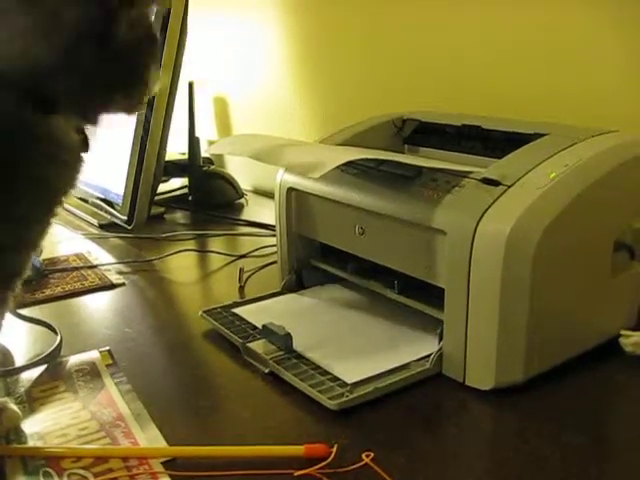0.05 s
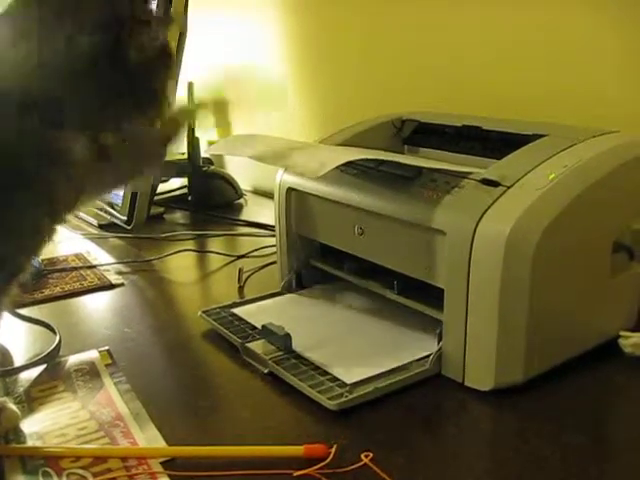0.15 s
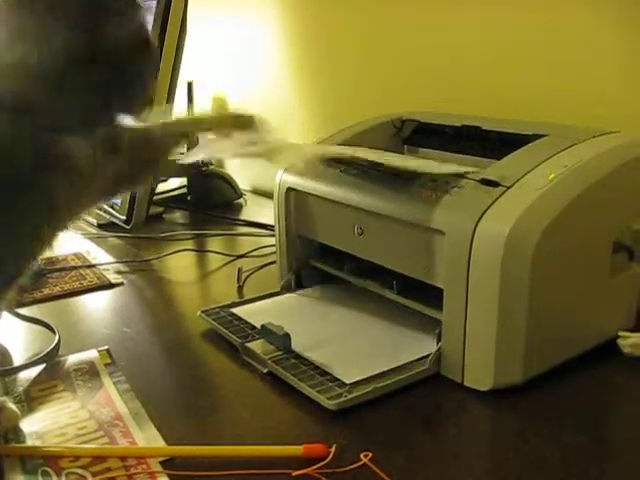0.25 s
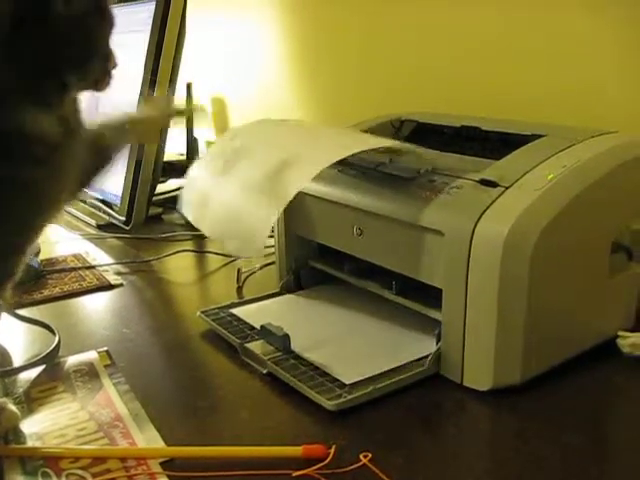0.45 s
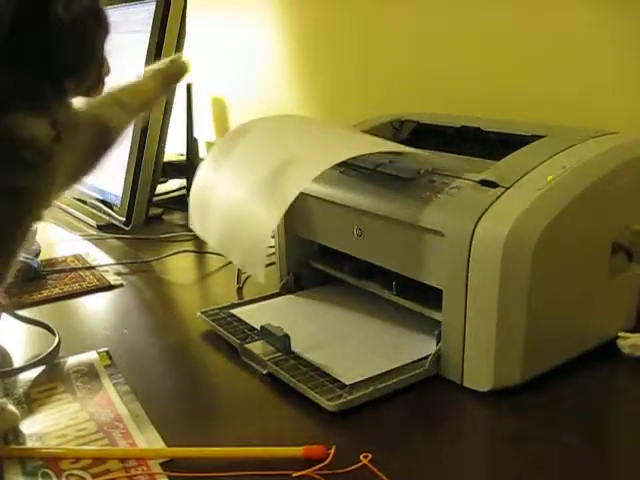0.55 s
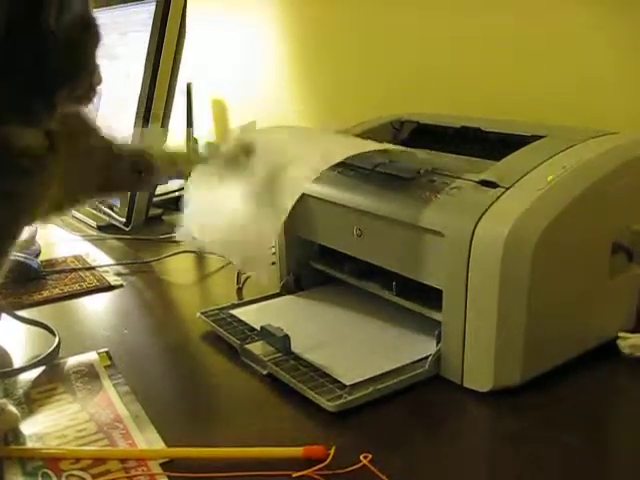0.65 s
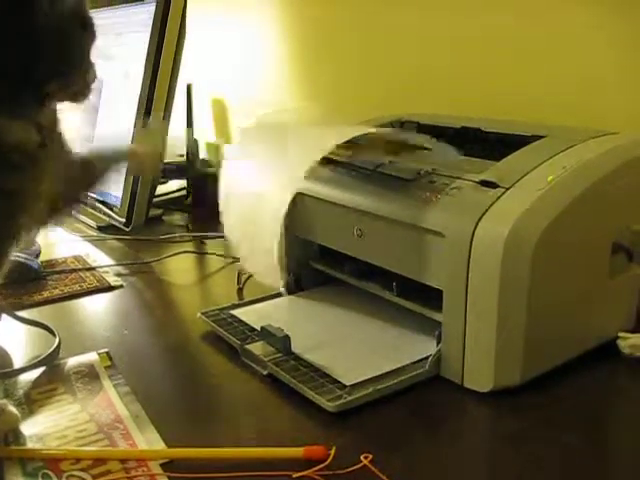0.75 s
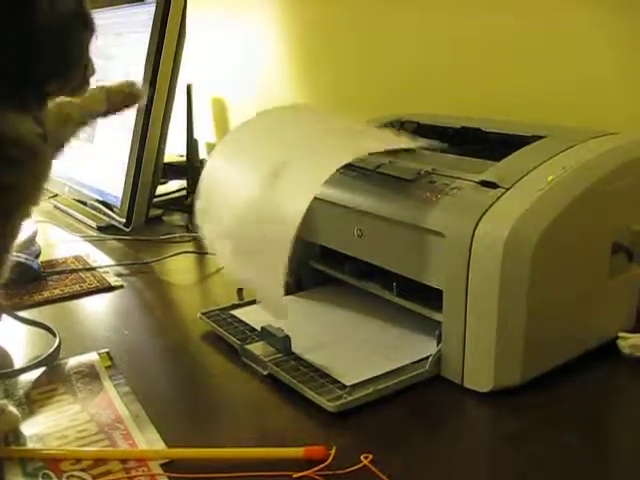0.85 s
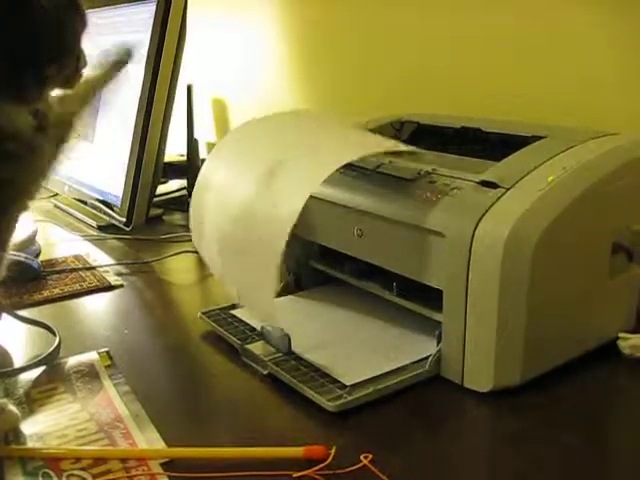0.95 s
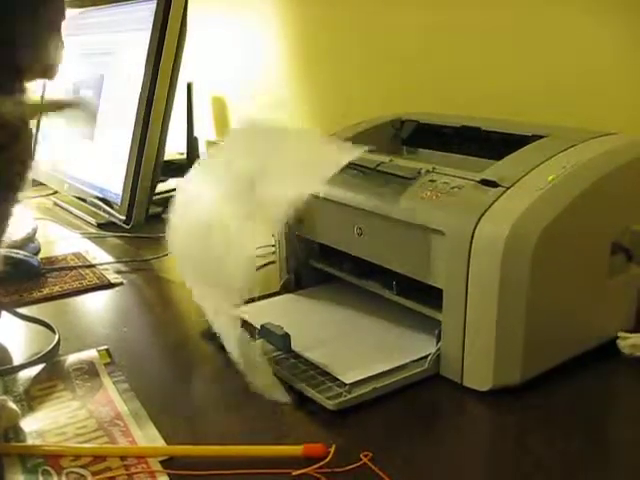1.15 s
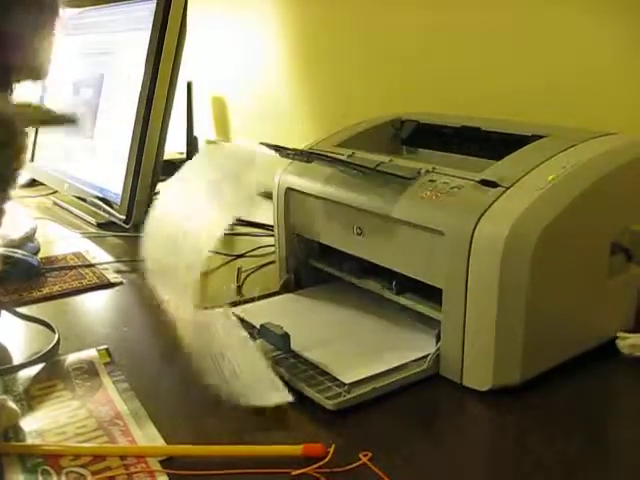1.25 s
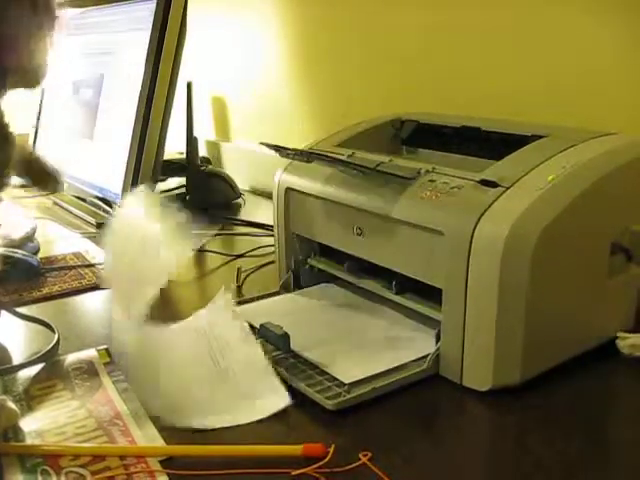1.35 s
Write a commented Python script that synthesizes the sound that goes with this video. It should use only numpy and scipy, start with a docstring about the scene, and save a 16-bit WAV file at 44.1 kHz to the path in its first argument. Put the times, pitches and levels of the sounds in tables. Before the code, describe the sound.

Paper slaps and rustles as a cat swats it three times against a printer, then it slips off, taps the plastic tray and scrapes the desk, over a steady fan hum in a small, slightly echoing room.

```python
"""A computer fan hums in a small room from start to end. In the first 0.7 s a cat swats a sheet of paper on a
printer three times: each blow slaps the sheet, thumps the printer and makes its plastic lid and the sheet ring,
and the sheet wobbles and crinkles. From 0.8 s the sheet slides off with a hiss. Near 1.1 s it lands edge first
on the paper tray, which rings, then scrapes on to the desk. The room echoes every paper sound."""
import sys
import numpy as np
from scipy import signal
from scipy.fft import rfft, irfft, next_fast_len
from scipy.io import wavfile
from scipy.ndimage import map_coordinates

SR = 44100
rng = np.random.default_rng(int(sys.argv[2]) if len(sys.argv) > 2 else 0)


def pcm_store(signal):
    """Save signal as 16-bit PCM."""
    levels = np.round(np.clip(np.atleast_2d(signal), -1, 1) * 32767)
    wavfile.write(sys.argv[1], SR, levels.astype(np.int16).T)


N = 61739

# A "colour" says how strong low and high pitches are; a "fade" is the time taken to drop by 60 dB.
# the fan's rushing air (frequency [Hz], relative level [dB])
FAN_COLOUR = [(20, -42), (40, -23), (62, -7), (95, -2.5), (150, -11.5), (210, -4.5), (320, -8.5), (500, -3),
              (950, -3), (1450, -9.5), (2200, -11.5), (3000, -11.5), (6200, -27), (16000, -35.5)]
# the fan's hum (frequency [Hz], average level [dB])
FAN_TONES = [(199.2, -60.5), (344.5, -62), (602.9, -51)]
# how long the room echoes (frequency [Hz], fade [s])
ECHO_FADES = [(150, 1), (600, 0.41), (2000, 0.33), (5000, .33), (14000, 0.3)]
# the echo's colour (frequency [Hz], relative level [dB])
ECHO_COLOUR = [(100, 0), (600, 5), (2500, 3), (6000, -1.5), (14000, -4)]
# the lid singing under the dragged sheet (time [s], level [dB])
DRAG_LEVELS = [(.62, -47), (.64, -35.5), (.672, -29.5), (.7, -42)]
# the printer's body taking each blow (time [s], level [dB], frequency [Hz])
BODY_THUMPS = [(.203, -46, 86), (0.38, -44, 98), (0.682, -68, 198), (1.08, -37, 228)]
# ringing tones after the swats and of the tray (frequency [Hz], level relative to the blow [dB], fade [s]);
# after the swats the lower tones are the lid's and those from 2 kHz up are the sheet's
SWAT_TONES = [(345.4, -30, 0.13), (490.5, -15, 0.046), (549.7, -24.5, 0.56), (1046, -18.5, 0.06),
              (2045, -7, 0.073), (2780, -16, 0.061), (4265, -12, 0.027)]
TRAY_TONES = [(548, -21, 0.46), (872, -13, 0.2), (932, -9.5, 0.2), (1220, -10.5, 0.14), (1315, -7, 0.077),
              (1690, -11.5, 0.23)]
# small crinkles and scuffs (time [s], level [dB], fade [s])
CRINKLES = [(0.2345, -18.5, 0.011), (0.309, -30.5, 0.29), (.454, -25, 0.014), (0.5333, -34.5, 0.038),
            (.538, -36, 0.068), (0.568, -32, 0.098), (0.6042, -32.5, .03), (0.6277, -27.5, 0.13),
            (0.6397, -41, 0.046), (0.8286, -33, 0.13), (0.8533, -31, 0.099), (.8998, -40, 0.046),
            (0.9136, -36.5, 0.27), (1.062, -29.5, 0.05), (1.34, -35, 0.033), (1.392, -36, 0.13)]
# the sheet sliding over the lid, then scraping over tray and desk (time [s], level [dB])
SLIDE_LEVELS = [(.81, -80), (.84, -42), (.895, -47), (.925, -29), (.955, -41.5), (.98, -31.5),
                (1.04, -31.5), (1.075, -34.5), (1.095, -39)]
SCRAPE_LEVELS = [(1.11, -66), (1.13, -36.5), (1.162, -36), (1.175, -42), (1.2, -32), (1.222, -35),
                 (1.24, -50), (1.26, -77)]
# blows on tray and lid (time [s], level [dB], rise [s], fade [s], treble tilt [dB per octave])
TRAY_HITS = [(1.0772, -12.5, 0.0019, 0.056, 2.5), (1.103, -25, 0.01, 0.079, -0.5),
             (1.126, -25, 0.0091, 0.13, -2.5), (1.148, -25.5, 0.002, 0.064, 5.5)]
LID_SLAPS = [(.1966, -20, 0.00016, 0.081, 2), (.2022, -16, 0.0014, 0.089, 1.5),
             (.2075, -11.5, 0.0029, 0.043, -1), (.218, -22, 0.0013, 0.067, 1.5),
             (.225, -17, 0.0021, 0.062, 1.5), (.372, -10.5, 0.0022, 0.053, 1.5),
             (.381, -12.5, 0.00067, 0.037, 3.5), (.6678, -22.5, 0.0012, 0.051, 0.5),
             (.677, -16.5, 0.0076, 0.048, -0.5), (.6838, -14, 0.0018, 0.039, -0.5)]
# the sheet flexing (time [s], level [dB], rise [s], fade [s], resonance [Hz], its boost [dB])
SHEET_FLAPS = [(0.237, -29, 0.01, 0.41, 3870, 9), (0.27, -27.5, 0.0089, 0.27, 4000, 6),
               (0.397, -26.5, 0.0028, 0.091, 3530, 20), (0.409, -17, 0.0099, 0.12, 2640, 11.5),
               (0.461, -23, 0.0092, 0.16, 2100, 5.5), (.48, -24.5, 0.0062, 0.17, 1960, 5),
               (0.694, -20, 0.0045, 0.068, 2650, 14.5), (0.7085, -17, 0.0016, 0.13, 2240, 13),
               (.73, -25.5, .008, 0.089, 1880, 8.5)]
# the colour of each paper sound (frequency [Hz], relative level [dB])
CRINKLE_COLOUR = [(200, -5), (1000, 3.5), (2500, 8), (5000, 2.5), (9000, -7), (16000, -22.5)]
SLIDE_COLOUR = [(88, -51), (150, -32), (348, 1.5), (406, -24), (466, -14), (1420, -17), (1940, -0.5),
                (3700, 3), (9260, -9.5), (16000, -29)]
SCRAPE_COLOUR = [(200, -17), (1000, -14), (3000, 3.5), (6000, 0), (10000, -6.5), (16000, -18)]
LANDING_COLOUR = [(70, -48), (130, -26), (220, -16.5), (350, -14), (560, -3), (720, -7), (950, -1),
                  (1250, -1.5), (1550, -1), (1900, 1), (2450, -2.5), (3200, -9), (5800, -17.5),
                  (9000, -33.5), (16000, -51)]
FLAP_COLOUR = [(90, -45), (160, -24), (220, -10.5), (330, -7.5), (530, -0.5), (800, -1.5), (1100, -1),
               (2000, -1.5), (3500, -7), (5000, -11), (6400, -17.5), (13000, -41), (16000, -42)]
SLAP_COLOUR = [(47, -53), (80, -22), (227, -14.5), (471, -6.5), (734, -6.5), (1050, -0.5), (1700, -4.5),
               (1990, 0.5), (2220, 0), (2780, -1), (3540, -7), (4140, -0.5), (6310, -12.5), (10300, -19.5),
               (11200, -26.5), (14600, -30.5), (16000, -38)]

FAN_DB, HUM_WAVER_DB, HUM_WAVER_RAD = -43.5, 1.7, 0.3
ECHO_DB, ECHO_BUILD_S = -8, 0.011
DRAG_HZ, DRAG_WAVER_RAD = 556, 0.3
RATTLE_PER_S, RATTLE_RAD = 70, 1
GRAINS_PER_S, HIT_GRAIN_DB, SLIDE_GRAIN_DB = 1200, 1.5, 2.5
GRIT_PER_S, GRIT_DB, GRIT_FADE_S = 240, -12, 0.0041
FLUTTER_PER_S, FLUTTER_DB = 90, 3.5
KNOCK_S, KNOCK_HZ, KNOCK_DB, KNOCK_WIDTH_S = 1.0795, 1123, -4, 0.0007
FLAP_WIDTH_OCTAVES = 0.8
TILT_FROM_HZ = 610  # a blow's hardness changes only the treble
CEILING, CEILING_HARDNESS, TOP_HZ = 0.75, 3, 16000


def gain(db):
    """Turn decibels into a number to multiply by."""
    return 10 ** (np.asarray(db) / 20)


def normalise(x):
    """Scale x to an average (rms) size of 1."""
    return x / np.sqrt(np.mean(x ** 2) + 1e-20)


def look_up(table, hz):
    """Read between the rows of a (frequency, value) table, on a pitch scale."""
    frequencies, values = np.transpose(table)
    return np.interp(np.log(hz + 1), np.log(frequencies + 1), values)


def clock():
    """The time of each sample in seconds."""
    return np.arange(N) / SR


def loudness_curve(rows):
    """A gain that follows (time, level) rows and is silent outside them."""
    times, db = np.transpose(rows)
    t = clock()
    return (t >= times[0]) * (t <= times[-1]) * gain(np.interp(t, times, db))


def wobble(per_s):
    """A curve that glides to a new random value per_s times a second."""
    return map_coordinates(rng.standard_normal(N), [clock() * per_s], order=1)


def filtered(x, gain_at):
    """Scale each frequency in x by gain_at(hz)."""
    size = next_fast_len(N + SR // 4)
    hz = np.fft.rfftfreq(size, 1 / SR)
    return irfft(rfft(x, size) * gain_at(hz), size)[:N]


def noise(colour, grain_db=0, tilt=0):
    """Coloured noise of size 1; grain_db clumps it into tiny grains and tilt brightens it."""
    grains = rng.standard_normal(N) * gain(grain_db * wobble(GRAINS_PER_S))
    tilt_db = lambda hz: tilt * np.log2(np.maximum(hz, TILT_FROM_HZ))
    return normalise(filtered(grains, lambda hz: gain(look_up(colour, hz) + tilt_db(hz))))


def strike(start, rise_s, fade_s):
    """The loudness of one hit: it climbs in a straight line, then dies away."""
    t = clock() - start
    return np.clip(t / rise_s, 0, 1) * gain(-60 * np.maximum(t - rise_s, 0) / fade_s)


def fan():
    """The fan makes a steady rush of air and slightly wavering tones."""
    hum = np.zeros(N)
    for hz, db in FAN_TONES:
        height = gain(db + HUM_WAVER_DB * wobble(per_s=10.6)) * np.sqrt(2)
        hum += height * np.sin(2 * np.pi * hz * clock() + HUM_WAVER_RAD * wobble(per_s=10.1))
    return gain(FAN_DB) * noise(FAN_COLOUR) + hum


def room_echo(x):
    """The room answers x with a blurred echo that builds quickly and dies sooner in the treble."""
    hz, t, spectrum = signal.stft(rng.standard_normal(SR * 3 // 4), SR, nperseg=256)
    fading = gain(-60 * t / look_up(ECHO_FADES, hz)[:, None])
    colour = gain(look_up(ECHO_COLOUR, hz))[:, None]
    tail = signal.istft(spectrum * fading * colour, SR, nperseg=256)[1]
    tail *= 1 - np.exp(-np.arange(len(tail)) / SR / ECHO_BUILD_S)
    return signal.fftconvolve(x, tail / np.linalg.norm(tail))[:N]


def lid_drag():
    """The lid sings briefly as the sheet is dragged over it."""
    waver = DRAG_WAVER_RAD * wobble(RATTLE_PER_S)
    return loudness_curve(DRAG_LEVELS) * np.sin(2 * np.pi * DRAG_HZ * clock() + waver)


def body_thumps():
    """The printer's body takes each blow with a low tone that dies quickly."""
    out = np.zeros(N)
    for start, db, hz in BODY_THUMPS:
        tone = np.sin(2 * np.pi * hz * (clock() - start))
        out += gain(db) * strike(start, rise_s=0.004, fade_s=0.084) * tone
    return out


def blow_ring(blows, tones):
    """Every blow feeds the struck things' own tones; they ring unevenly."""
    out = np.zeros(N)
    for hz, tone_db, fade in tones:
        energy = sum((gain(db) * strike(start, rise, fade)) ** 2 for start, db, rise, _, _ in blows)
        rattle = RATTLE_RAD * wobble(RATTLE_PER_S)
        out += gain(tone_db) * np.sqrt(energy) * np.sin(2 * np.pi * hz * clock() + rattle)
    return out


def crinkles():
    """The sheet gives short bright ticks as it bends and catches."""
    ticks = sum(gain(db) * strike(start, rise_s=0.00091, fade_s=fade) for start, db, fade in CRINKLES)
    return ticks * noise(CRINKLE_COLOUR, HIT_GRAIN_DB)


def grit():
    """The paper's edge catches at random on the textured plastic, each time with a tiny hiss."""
    catches = (rng.random(N) < GRIT_PER_S / SR) * (0.5 + rng.random(N))
    t = np.arange(SR // 50) / SR
    fading_catches = signal.fftconvolve(catches, gain(-60 * t / GRIT_FADE_S))[:N]
    return normalise(fading_catches * noise(CRINKLE_COLOUR))


def sliding():
    """The sheet rubs over plastic and desk; its hiss flutters as it sticks and slips."""
    slide, scrape = loudness_curve(SLIDE_LEVELS), loudness_curve(SCRAPE_LEVELS)
    hiss = slide * noise(SLIDE_COLOUR, SLIDE_GRAIN_DB) + scrape * noise(SCRAPE_COLOUR, SLIDE_GRAIN_DB)
    flutter = gain(FLUTTER_DB * wobble(FLUTTER_PER_S))
    return hiss * flutter + gain(GRIT_DB) * (slide + scrape) * grit()


def paper_hits(blows, colour):
    """Paper hitting plastic makes one burst of noise for each blow."""
    return sum(gain(db) * strike(start, rise, fade) * noise(colour, HIT_GRAIN_DB, tilt)
               for start, db, rise, fade, tilt in blows)


def landing():
    """The sheet's stiff edge knocks on the tray and the sheet buckles."""
    t = clock() - KNOCK_S
    knock = gain(KNOCK_DB) * np.exp(-(t / KNOCK_WIDTH_S) ** 2) * np.sin(2 * np.pi * KNOCK_HZ * t)
    return knock + paper_hits(TRAY_HITS, LANDING_COLOUR)


def flaps():
    """Each flex is a puff of noise with one boosted pitch, mostly lower each time as the sheet relaxes."""
    out = np.zeros(N)
    for start, db, rise, fade, peak_hz, boost_db in SHEET_FLAPS:
        bump = lambda hz: np.exp(-(np.log2((hz + 1) / peak_hz) / FLAP_WIDTH_OCTAVES) ** 2)
        puff = filtered(noise(FLAP_COLOUR, HIT_GRAIN_DB), lambda hz: gain(boost_db * bump(hz)))
        out += gain(db) * strike(start, rise, fade) * normalise(puff)
    return out


def swats():
    """The paw claps the sheet on to the lid; the sheet flexes afterwards."""
    return paper_hits(LID_SLAPS, SLAP_COLOUR) + flaps()


def scene():
    """Add up the paper sounds with their echoes, the printer and the fan."""
    paper_sounds = [swats(), crinkles(), sliding(), landing()]
    paper = sum(sound + gain(ECHO_DB) * room_echo(sound) for sound in paper_sounds)
    lid = blow_ring(LID_SLAPS, SWAT_TONES)
    tray = blow_ring(TRAY_HITS[:1], TRAY_TONES)  # only the first hit rings the tray
    printer = lid + tray + body_thumps() + lid_drag()
    return (paper + printer + fan())[None]


def record(dry):
    """The microphone rounds off the highest peaks, and everything above TOP_HZ is cut."""
    squeeze = (1 + np.abs(dry[0] / CEILING) ** CEILING_HARDNESS) ** (1 / CEILING_HARDNESS)
    return filtered(dry[0] / squeeze, lambda hz: hz < TOP_HZ)[None]


dry = scene()
out = record(dry)
pcm_store(out)
```